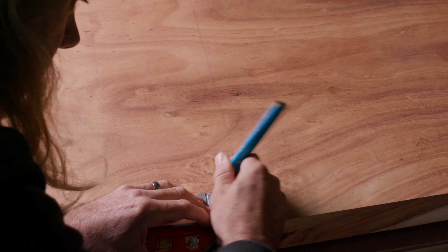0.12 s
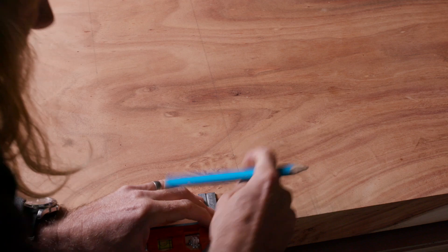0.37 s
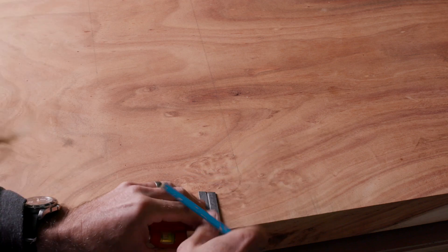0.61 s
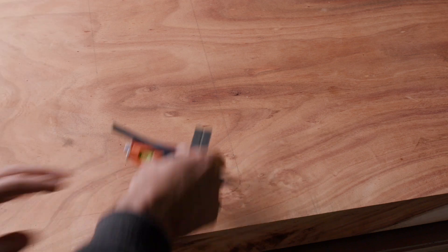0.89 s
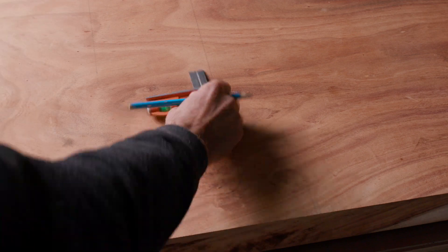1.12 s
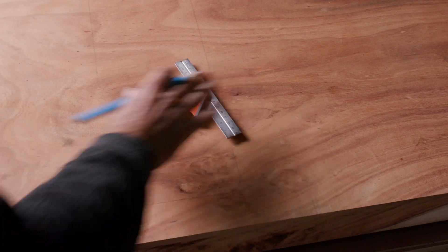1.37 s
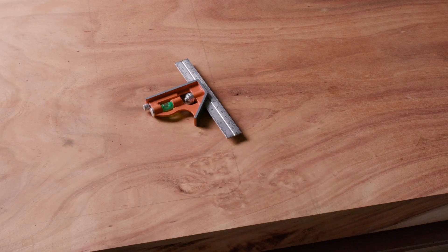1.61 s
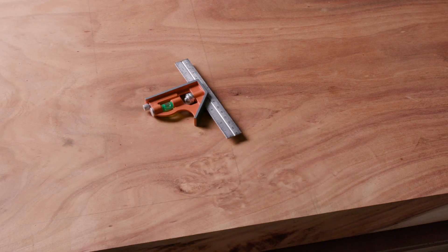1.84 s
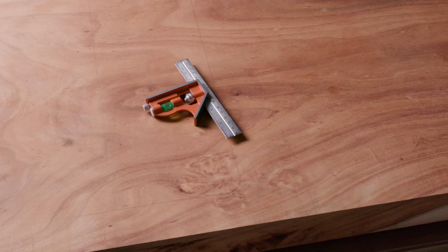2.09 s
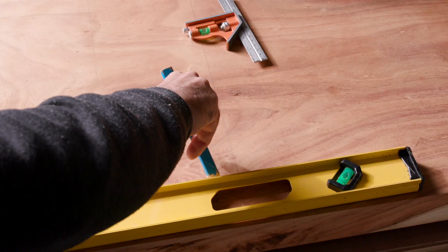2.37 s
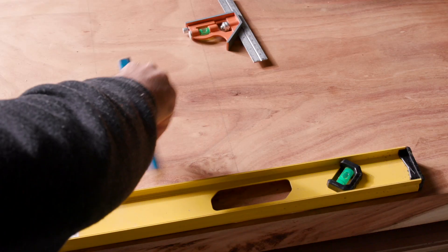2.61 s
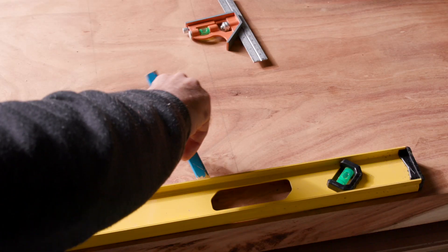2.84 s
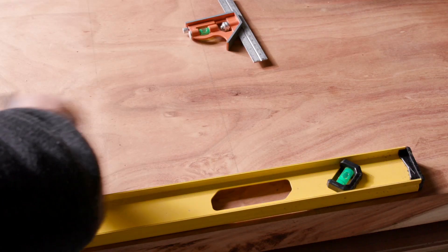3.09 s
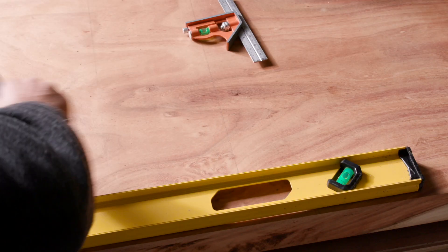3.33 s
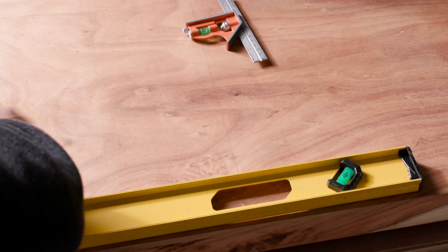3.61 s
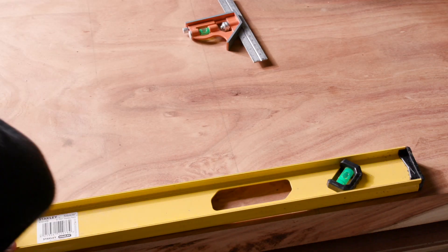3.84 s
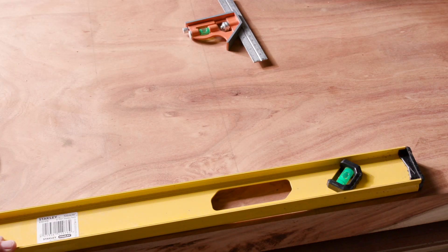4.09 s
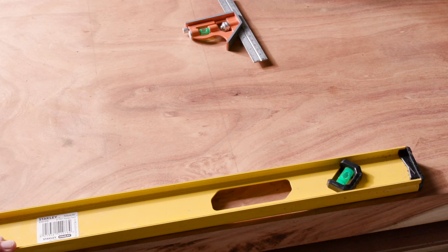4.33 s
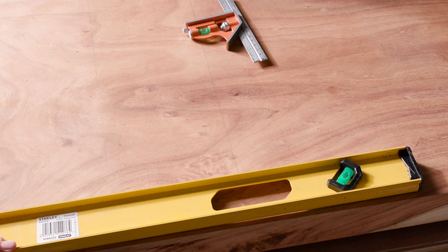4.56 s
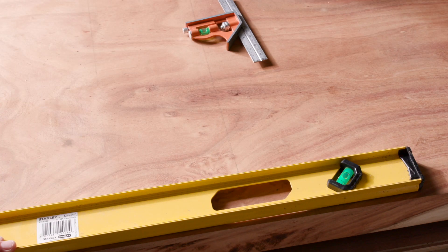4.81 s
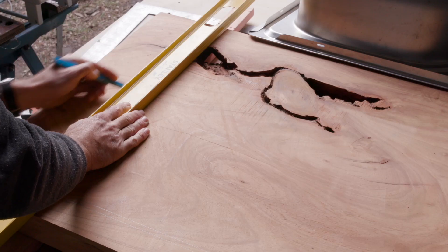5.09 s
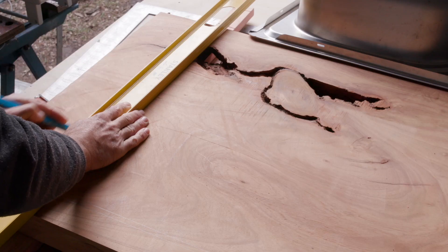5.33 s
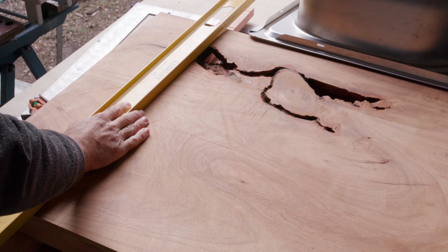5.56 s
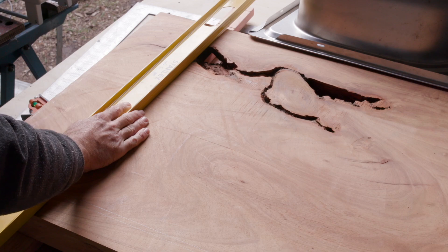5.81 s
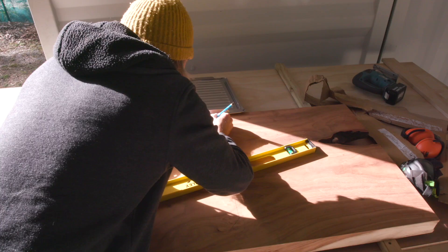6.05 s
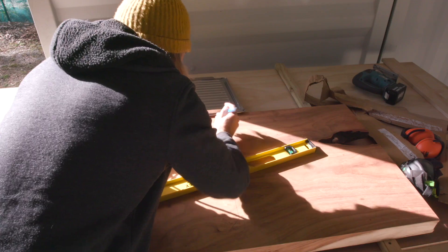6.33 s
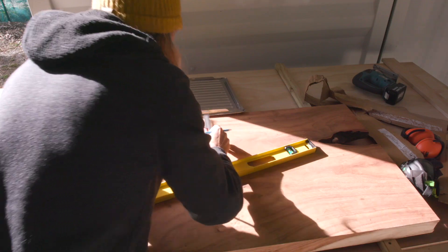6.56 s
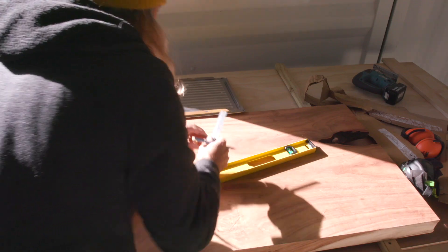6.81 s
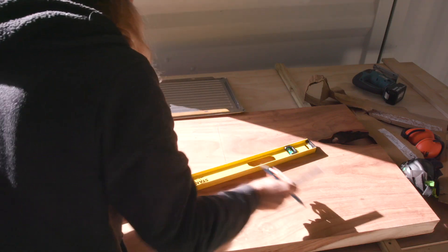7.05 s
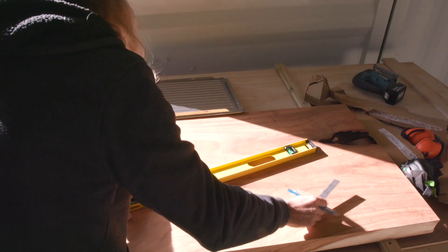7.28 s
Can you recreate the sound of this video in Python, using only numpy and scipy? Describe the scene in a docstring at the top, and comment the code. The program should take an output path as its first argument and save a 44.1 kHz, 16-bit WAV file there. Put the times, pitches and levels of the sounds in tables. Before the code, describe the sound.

Close-up woodworking sounds, mono, with a short room tail. Tiny metallic chatter leads to a double set of hard metal-on-wood clacks, then dull bench and floor thumps. Pencil taps and quick strokes against a metal rail give way to long gritty scratching, broken by a sharp tap. Near the end a subtle drop in the distant traffic background precedes another bouncing metal clack.

```python
"""Distant traffic, a low hum and a faint hiss are heard first, all made of filtered noise. A metal square then
chatters, is set down and bounces on a hardwood slab, and a pencil taps and scrapes along an aluminium rail: short
forces and stick-slip excite damped modes. Rough pushes thump floor and bench, and the hard walls of an open-fronted
workshop prolong the tool sounds with a noise tail. Late on, a cut ends that tail abruptly, and from there on
traffic and hum are quieter."""
import sys
import numpy as np
from scipy import signal
from scipy.fft import rfft, irfft
from scipy.io import wavfile
from scipy.ndimage import uniform_filter1d

SR = 44100
rng = np.random.default_rng(int(sys.argv[2]) if len(sys.argv) > 2 else 0)


def generate_wav(signal):
    """Clip the signal to [-1, 1] and save it as 16-bit WAV at the path in sys.argv[1]."""
    frames = np.transpose(np.atleast_2d(signal))
    scaled = np.clip(frames, -1, 1) * 32767
    pcm = np.round(scaled).astype(np.int16)
    wavfile.write(sys.argv[1], SR, pcm)


def voltage_ratio(level):
    """Linear amplitude factor for a level in decibels (scalar or array-like)."""
    return 10 ** (np.asarray(level, float) / 20)


N = 327222
T = np.arange(N) / SR  # time of every sample [s]

# Square set down or bouncing, a soft knock on the bench, a tiny blade tick: (event time [s], blow level [dB],
# relative slab thud [dB], relative sharpness of the edge [dB], contact pitch [Hz])
SQUARE_DROPS = [(0.444, -40.5, -7.5, -38, 1260), (1.097, -22, 3, -12.5, 850), (1.116, -26, -7.5, -12, 935),
                (1.133, -30, -16, -8, 960), (1.288, -29, -21, -4.5, 750), (1.296, -17, -13.5, -11.5, 1407),
                (1.308, -13.5, -7, -2.5, 1283), (6.204, -56, -4, -6.5, 1300),
                (6.501, -45.5, -3.5, -26, 502), (6.59, -41.5, -20, -44, 303), (7.064, -63, -20, -5, 7200),
                (7.245, -19.5, -3, -9.5, 1153), (7.393, -40, 3.5, -15, 1200),
                (7.411, -33.5, -3.5, -17, 600)]
# Pencil knocking the rail: (event time [s], blow level [dB], relative slab thud [dB],
# relative sharpness of the edge [dB], contact pitch [Hz])
PENCIL_TAPS = [(1.954, -51, -1, -35, 600), (2.16, -32, -12, -14, 1707), (2.879, -34, -36.5, -3, 600),
               (2.884, -26, -19.5, -3, 2326), (3.074, -39, -14, -18, 1130), (3.096, -31, -23.5, -18, 1160),
               (3.148, -29, -24.5, -24, 1440), (3.214, -32, -28, -10, 1500), (3.243, -39, -20.5, -13, 1640),
               (3.514, -18.5, -19, -3, 1998), (3.831, -35, -28.5, -25.5, 1080),
               (3.953, -34, -29, -18, 1460), (4.891, -23.5, -8, -13, 810)]
# Short pencil strokes: (peak time [s], rise [s], fall [s], rail level [dB], lead hiss over rail [dB])
SHORT_STROKES = [(0.745, 0.089, .1, -68.5, -8.5), (0.82, 0.13, .12, -74, 1.5),
                 (2.06, 0.24, 0.26, -70.5, -4), (2.536, 0.051, 0.035, -43, -7),
                 (3.04, .12, 0.16, -53.5, -8), (3.15, 0.13, 0.088, -41.5, -9),
                 (3.224, 0.08, 0.043, -46.5, -5.5), (6.41, 0.042, .08, -71.5, -0.5),
                 (6.52, 0.052, 0.088, -75, -15.5)]
# Two long lines drawn along the rail, each a list of (time [s], rail level [dB], lead hiss over rail [dB])
LONG_LINES = [
    [(3.6, -59, -7), (3.73, -57, -2.5), (3.82, -61.5, -2), (3.835, -56, -5.5), (3.945, -49, -15.5),
     (4.08, -66, -7.5), (4.22, -59, -15), (4.24, -54.5, -18.5), (4.47, -59, -19), (4.54, -60.5, -20),
     (4.69, -59.5, -10), (4.81, -82, -5)],
    [(4.82, -69, -5), (4.87, -58.5, -16), (4.885, -62, -3), (4.95, -57.5, -3), (5.06, -64.5, 0),
     (5.23, -56, -4.5), (5.44, -67.5, -1.5), (5.6, -76, -1.5), (5.63, -70.5, 1.5), (5.98, -78, -11),
     (6.04, -62, -9.5)],
]
# Loose blade of the square chattering in the hand: (peak time [s], rise [s], fall [s], level [dB])
BLADE_CHATTER = [(0.36, .025, 0.16, -72.5), (0.575, 0.028, .01, -71), (0.736, 0.046, 0.033, -63),
                 (6.42, .04, .05, -82), (6.51, .04, .05, -70), (6.891, .06, .06, -79)]
# Low thumps of floor and bench: feet, the bench after drops, a late drag:
# (peak time [s], rise [s], fall [s], deep boom [dB], board creak [dB])
LOW_THUMPS = [(1.12, 0.024, .2, -62, -45), (1.33, .04, .2, -57, -38.5), (1.65, .1, 0.073, -43, -50),
              (1.71, 0.091, 0.15, -36, -59), (1.979, 0.073, 0.22, -47, -55), (2.15, .1, 0.045, -55, -67.5),
              (6.52, 0.059, 0.078, -63, -50.5), (6.606, 0.064, 0.051, -65, -55)]
# Modes of the hardwood slab: (frequency [Hz], relative level [dB], decay by 60 dB [s])
SLAB_MODES = [(109, -11.5, .15), (275, -6, 0.09), (381, -8.5, 0.057), (483, -4, .06), (533, -1.5, 0.068),
              (607, 2.5, 0.045), (708, 8.5, 0.016), (839, 9.5, 0.016), (954, 2.5, 0.044), (1080, -0.5, .04),
              (1364, 2, 0.025), (1680, -5.5, 0.036)]
# Modes of the square's blade, damped by hand and wood: (frequency [Hz], relative level [dB])
BLADE_MODES = [(1850, 3), (2130, -1), (2630, -1), (3150, -3.5), (3600, -10), (4000, -7), (4570, 1),
               (5200, -11.5), (5900, 4.5), (6400, 3.5), (7320, 8.5), (7780, -9.5), (8400, -11),
               (8830, -9.5), (9350, -9.5), (9800, -18), (11000, -26), (11630, -31.5)]
# Modes of the aluminium rail, damped by hand and wood: (frequency [Hz], relative level [dB])
RAIL_MODES = [(1170, -9), (1400, -1), (1490, 5.5), (1600, 5), (1800, 3.5), (1930, 1), (2300, -5),
              (2780, -10), (3200, -9), (3650, -10.5), (4200, -10.5), (5450, -16), (6900, -21.5),
              (9600, -21)]
# Air inside the bench: (frequency [Hz], decay by 60 dB [s])
BENCH_HOLLOW = (290, .3)
# Low thump modes, joists then boards, each a list of (frequency [Hz], relative level [dB], decay by 60 dB [s])
FLOOR_MODES = [(35, -0.5, 0.076), (108, 3.5, 0.071)], [(196, 3.2, 0.022), (283, 0.5, 0.058),
               (402.6, 1, 0.017)]
# Spectrum of the pencil lead on the grain: (frequency [Hz], relative level per Hz [dB])
LEAD_SPECTRUM = [(1470, -28), (2500, -5.5), (4080, -9.5), (4440, -19.5), (5440, -15), (8020, -24),
                 (9890, -24), (16000, -36)]
# Reverberant tail by band: (centre frequency [Hz], decay by 60 dB [s], starting level [dB])
ROOM_BANDS = [(90, 0.74, -10.5), (253, 0.59, -1), (600, 0.67, -1), (1390, 0.52, -2), (3010, 0.47, -3.5),
              (6000, 0.43, -3), (11900, 0.17, 0.5)]
# Spectrum of traffic and hiss: (frequency [Hz], relative level per Hz [dB])
AIR_SPECTRUM = [(15, -48.5), (25, -12), (37, -8), (60, -3), (114, -7.5), (138, -11.5), (171, -10.5),
                (251, -19), (303, -17), (1210, -25), (1970, -40), (14300, -47.5), (16300, -50)]

BLADE_CYCLES, RAIL_CYCLES = 20, 13  # each metal mode decays by 60 dB within so many cycles
BLADE_RING_DB, RAIL_RING_DB = 6, 15.5  # a sharp edge cracks and rings the metal: weight of ring against crack
DELAY_S = 0.001  # short fixed delay of every blow
SWELL_DB = 20  # rise and fall are the times for this change of level
BRIGHT_S, BRIGHT_DB = 4.86, -2.5  # from BRIGHT_S on the lead hiss is brighter: weight of the added treble
# Slab drone: its nominal level at a rail level of TOUCH_DB, and the dB gained per dB of rail;
# a slow, heavy stroke drones more and hisses less: dB lost per dB of hiss over rail
TOUCH_DB, DRONE_DB, DRONE_SLOPE, DRONE_TRADE = -60, -62, 0.34, 0.4
AIR_DB, HUM_HZ, HUM_DB = -60.5, 52.7, -64.5  # mean levels up to CUT_S
CUT_S, TAIL_GAP_S, AFTER_CUT_DB = 6.044, 0.15, -5  # traffic and hum are quieter from the cut on


def blows(events, metal, cycles, ring_db, crack_hz, crack_s, contact_t60, hollow_db, slap_db):
    """Impulse response: a brief contact force excites the modes of slab, metal and hollow, with a crack."""
    out, length = np.zeros(N + SR), SR // 2
    t = T[:length]
    crack_band = signal.butter(2, crack_hz, "band", fs=SR)
    hollow_hz, hollow_t60 = BENCH_HOLLOW
    for s, db, slab_db, edge_db, hz in events:
        kick_noise, crack_noise = rng.standard_normal((2, length))
        # mode levels vary at random from blow to blow
        vary_slab, vary_metal = 1.5 * rng.standard_normal((2, 20))
        slab_modes = [(f, d + v, t60) for (f, d, t60), v in zip(SLAB_MODES, vary_slab)]
        metal_modes = [(f, d + v, cycles / f) for (f, d), v in zip(metal, vary_metal)]

        # one smooth bump of force, half a period of the contact pitch long
        push = np.sin(np.pi * np.clip(t * 2 * hz, 0, 1)) ** 2 * np.pi * hz / SR
        thud = ring(push, slab_modes) / 2
        notes = ring(push, [(hz, -3, contact_t60), (hz * 0.84, -7, contact_t60),
                            (hz * 1.21, -8, contact_t60), (hollow_hz, hollow_db, hollow_t60)])
        # sharp click at the contact: one cycle, the slope of the force
        slap = np.gradient(push) * (SR / hz / np.pi) ** 2 / 2

        kick = kick_noise * np.exp(-t / 0.0004)
        kick = kick / np.sqrt(np.sum(kick ** 2))  # unit energy
        metal_ring = ring(kick, metal_modes) / 3
        crack = signal.lfilter(*crack_band, crack_noise * np.exp(-t / crack_s))
        edge = voltage_ratio(ring_db) * metal_ring + crack

        blow = voltage_ratio(slab_db) * thud + voltage_ratio(edge_db) * edge + notes + voltage_ratio(slap_db) * slap
        i = int((s + DELAY_S) * SR)
        out[i:i + length] += voltage_ratio(db) * blow
    return out[:N]


def square_drops():
    """Impact of the square on wood excites the high modes of its blade and a bright crack."""
    return blows(SQUARE_DROPS, BLADE_MODES, BLADE_CYCLES, BLADE_RING_DB, crack_hz=[5200, 10500],
                 crack_s=0.0034, contact_t60=0.032, hollow_db=-35.5, slap_db=-11.5)


def pencil_taps():
    """Impact of the pencil excites the lower modes of the rail and a shorter, duller crack."""
    return blows(PENCIL_TAPS, RAIL_MODES, RAIL_CYCLES, RAIL_RING_DB, crack_hz=[2400, 7500],
                 crack_s=0.0019, contact_t60=0.028, hollow_db=-34, slap_db=-4.5)


def pencil_strokes():
    """Stick-slip friction of the lead drives the rail and the slab under it, and hisses on the grain."""
    rail_db, hiss_db = track(LONG_LINES, [-120, 0])
    rail_gain, hiss_gain = fade(rail_db), fade(rail_db + hiss_db)
    for peak, rise, fall, db, lead_db in SHORT_STROKES:
        shape = voltage_ratio(db) * swell(peak, rise, fall)
        rail_gain = rail_gain + shape
        hiss_gain = hiss_gain + voltage_ratio(lead_db) * shape

    # the slab drones even under a light touch
    touch = rail_gain / voltage_ratio(TOUCH_DB)
    contact = touch / (touch + voltage_ratio(-18))  # gone when the lead lifts
    slab_gain = voltage_ratio(DRONE_DB) * touch ** DRONE_SLOPE * contact
    slab_gain = slab_gain * (rail_gain / hiss_gain) ** DRONE_TRADE

    judder = voltage_ratio(1.8 * walk(45))
    slips = grit(2000, 2.0) * judder
    rail_modes = [(f, d, RAIL_CYCLES / f) for f, d in RAIL_MODES]
    rail = unit(ring(slips, rail_modes, drift_db=2.0))
    hollow_hz, hollow_t60 = BENCH_HOLLOW
    slab_modes = SLAB_MODES[1:] + [(hollow_hz, -12, hollow_t60)]
    slab = unit(ring(slips, slab_modes, drift_db=2.5))

    hiss = unit(colour(grit(9000, 2.5) * judder, LEAD_SPECTRUM))
    treble = signal.lfilter(*signal.butter(2, 7500, "high", fs=SR), hiss)
    hiss = hiss + voltage_ratio(BRIGHT_DB) * (T > BRIGHT_S) * treble
    return rail_gain * rail + slab_gain * slab + hiss_gain * hiss


def blade_chatter():
    """Trains of tiny random impacts excite the high blade modes, now one and now another."""
    # (frequency [Hz], relative level [dB], decay by 60 dB [s])
    favoured = [(3600, -3, 0.012), (5950, 0, 0.015), (7300, -4, 0.012),
                (8300, -4, 0.012), (9350, 0, 0.015), (11630, -6, 0.012)]
    gain = sum(voltage_ratio(db) * swell(*shape) for *shape, db in BLADE_CHATTER)
    return gain * unit(ring(grit(1200, 2.2), favoured, drift_db=6.0))


def room(x, wet_db, first_s):
    """Reverberation: a dense diffuse tail begins at first_s; each band decays at its own rate, treble fastest."""
    t = T[:SR]
    log_hz = np.log(np.arange(SR // 2 + 1) + 1.)
    centres = np.log(np.array(ROOM_BANDS)[:, 0])
    noise, tail = rfft(rng.standard_normal(SR)), 0
    for k, (hz, t60, db) in enumerate(ROOM_BANDS):
        weight = np.interp(log_hz, centres, np.arange(len(ROOM_BANDS)) == k)
        band = irfft(noise * weight, SR)
        tail = tail + voltage_ratio(db - 60 * t / t60) * band
    tail = tail * np.clip(t / first_s - 1, 0, 1)
    return x + voltage_ratio(wet_db) * signal.fftconvolve(x, tail)[:N]


def cut_tail(wet):
    """Gating: a gain of zero for TAIL_GAP_S after the cut ends abruptly what was still ringing."""
    return wet * ~((T > CUT_S) & (T < CUT_S + TAIL_GAP_S))


def low_thumps():
    """Forced vibration: rough pushes, modelled as noise, excite the low modes of joists and boards."""
    joists, boards = (unit(ring(rng.standard_normal(N), modes)) for modes in FLOOR_MODES)
    return sum(swell(*shape) * (voltage_ratio(boom_db) * joists + voltage_ratio(creak_db) * boards)
               for *shape, boom_db, creak_db in LOW_THUMPS)


def air():
    """Filtered noise: fluctuating low-passed traffic and a narrow-band wavering hum, over a steady hiss."""
    noise = unit(colour(rng.standard_normal(N), AIR_SPECTRUM)) * voltage_ratio(AIR_DB)
    traffic = signal.lfilter(*signal.butter(2, 2500, fs=SR), noise)
    hiss = noise - traffic
    hum = unit(ring(rng.standard_normal(N), [(HUM_HZ, 0, 0.25)]))
    hum = voltage_ratio(HUM_DB + 1.3 * walk(11)) * hum
    distant = traffic * voltage_ratio(1.0 * walk(5.9)) + hum
    return hiss + distant * voltage_ratio(AFTER_CUT_DB * (T > CUT_S))


def ring(x, modes, drift_db=0):
    """Modal superposition: damped resonators of alternate sign; drift varies each as the contact moves."""
    out = 0
    for k, (hz, db, t60) in enumerate(modes):
        r = np.exp(-np.log(1000) / (t60 * SR))
        w = 2 * np.pi * hz / SR
        push = x * voltage_ratio(drift_db * walk(9)) if drift_db else x
        mode = signal.lfilter([0, np.sin(w)], [1, -2 * r * np.cos(w), r * r], push)
        out = out + (-1) ** k * voltage_ratio(db) * mode
    return out


def grit(density, spread_db):
    """Random impulse train: slips of uneven size, on average density a second, at rms 1."""
    slips = rng.random(N) < density / SR
    return unit(slips * rng.standard_normal(N) * voltage_ratio(spread_db * rng.exponential(size=N)))


def walk(rate):
    """Slow random modulation: levels held 1 / rate s, smoothed twice and scaled to rms 1."""
    k = int(SR / rate)
    steps = np.repeat(rng.standard_normal(N // k + 1), k)
    smooth = uniform_filter1d(uniform_filter1d(steps, k), k)
    return unit(smooth[:N])


def swell(peak, rise, fall):
    """Exponential envelope: gain 1 at the peak, sinking evenly in dB to either side."""
    distance = np.where(T < peak, (peak - T) / rise, (T - peak) / fall)
    return voltage_ratio(-SWELL_DB * np.minimum(distance, 10))


def fade(db):
    """Smoothed envelope: the gain of a level track, averaged over 8 ms so that nothing starts with a click."""
    return uniform_filter1d(voltage_ratio(db), size=350)


def track(tables, rest):
    """Linear interpolation of the table columns at every sample, with rest values between tables."""
    out = np.tile(np.array(rest, float)[:, None], N)
    for table in tables:
        s, *columns = np.transpose(table)
        inside = (T >= s[0]) & (T <= s[-1])
        out[:, inside] = [np.interp(T[inside], s, c) for c in columns]
    return out


def colour(x, points):
    """Spectral shaping: weights the spectrum by (frequency [Hz], level [dB]) points on a log-frequency axis."""
    hz, db = np.transpose(points)
    f = np.arange(len(x) // 2 + 1) * SR / len(x) + 1
    return irfft(rfft(x) * voltage_ratio(np.interp(np.log(f), np.log(hz), db)), len(x))


def unit(x):
    """Normalisation to an rms value of 1."""
    return x / np.sqrt(np.mean(x ** 2))


def scene():
    """Superposition: tools with their reverberation, its tail cut once, over low thumps and air."""
    tools = square_drops() + pencil_taps() + pencil_strokes() + blade_chatter()
    wet = room(tools, wet_db=-31.0, first_s=0.002)
    return (cut_tail(wet) + low_thumps() + air())[None]


def low_pass(x):
    """Removes everything above the highest recorded frequency."""
    return signal.sosfilt(signal.butter(12, 16480, fs=SR, output="sos"), x)


def record(dry):
    """High-pass filtering: the microphone drops the deepest bass, below 34 Hz."""
    bass_cut = signal.butter(3, 34, "high", fs=SR, output="sos")
    mix = signal.sosfilt(bass_cut, dry)
    return low_pass(mix)


dry = scene()
out = record(dry)
generate_wav(out)
```